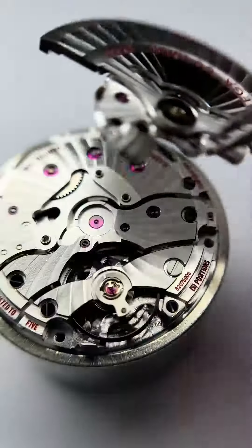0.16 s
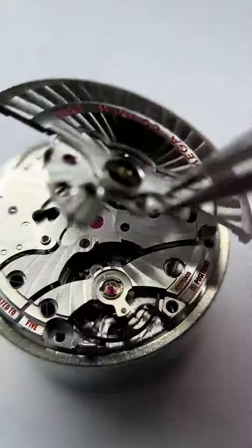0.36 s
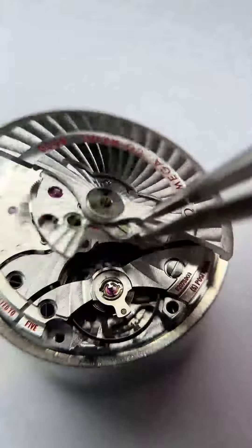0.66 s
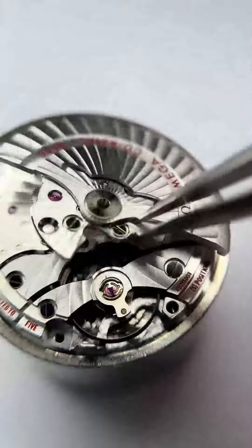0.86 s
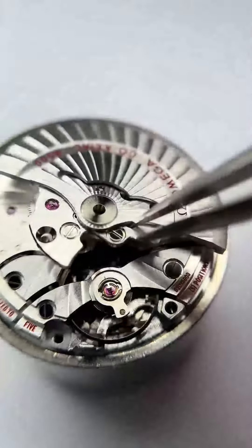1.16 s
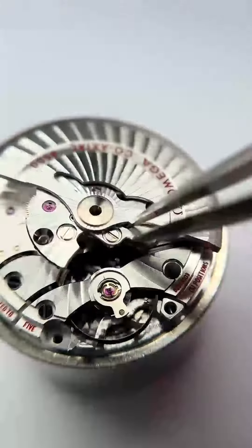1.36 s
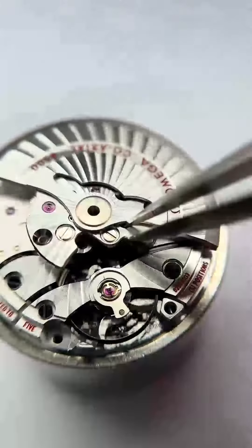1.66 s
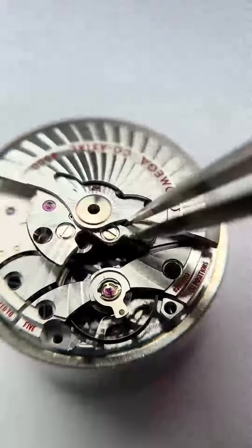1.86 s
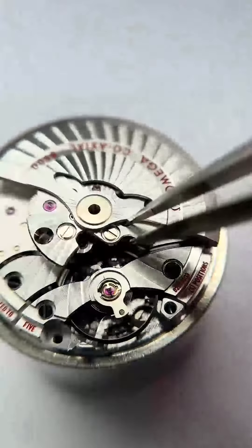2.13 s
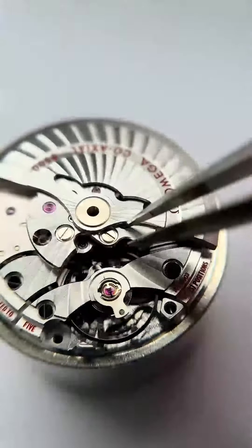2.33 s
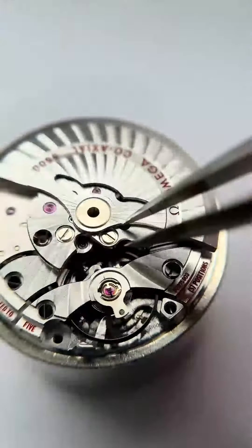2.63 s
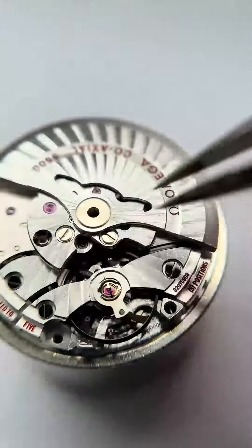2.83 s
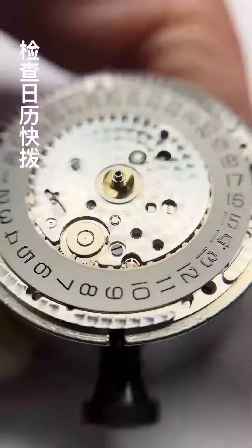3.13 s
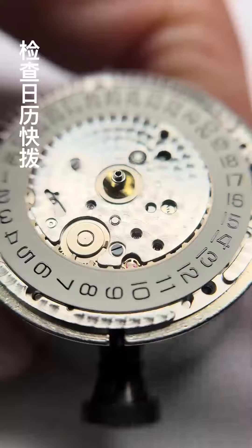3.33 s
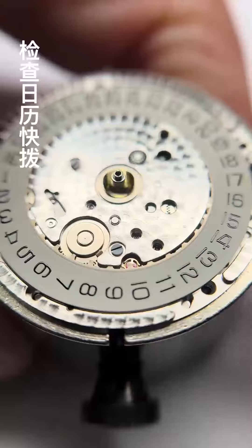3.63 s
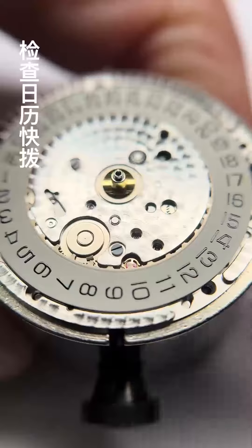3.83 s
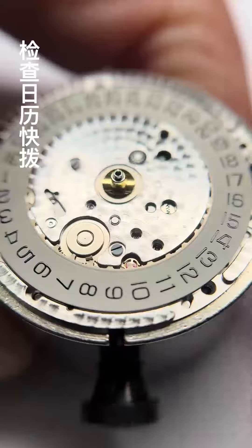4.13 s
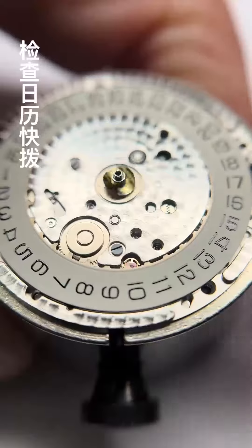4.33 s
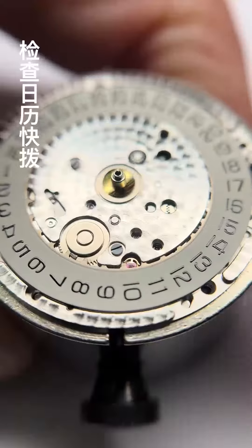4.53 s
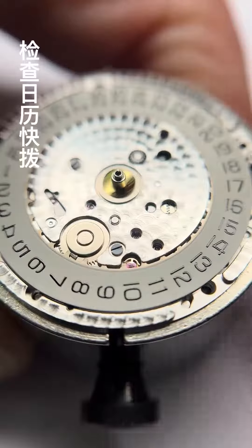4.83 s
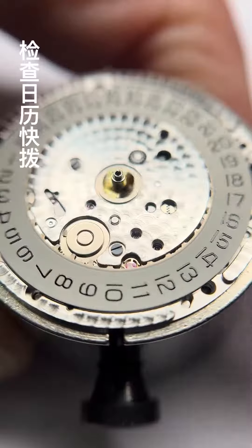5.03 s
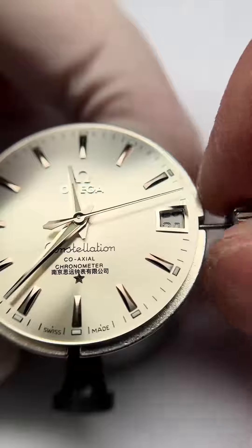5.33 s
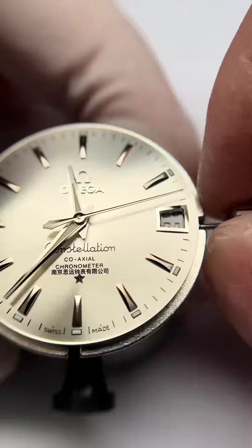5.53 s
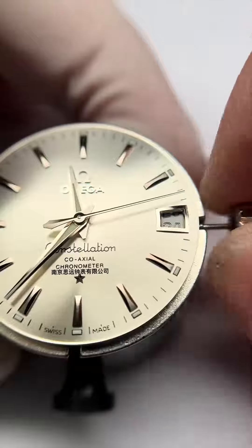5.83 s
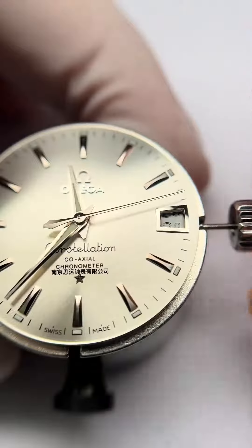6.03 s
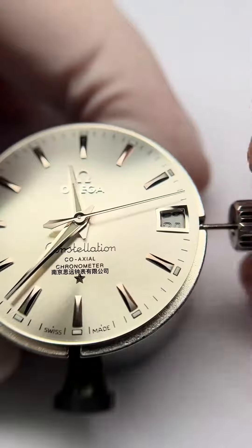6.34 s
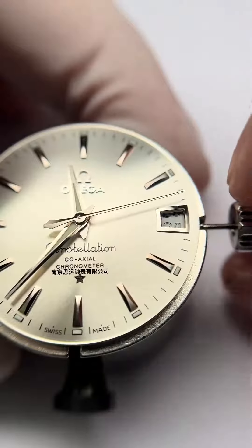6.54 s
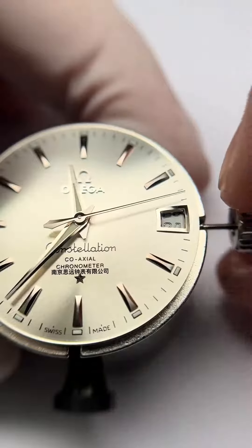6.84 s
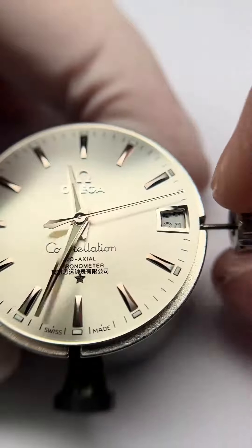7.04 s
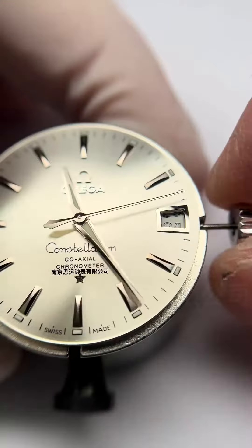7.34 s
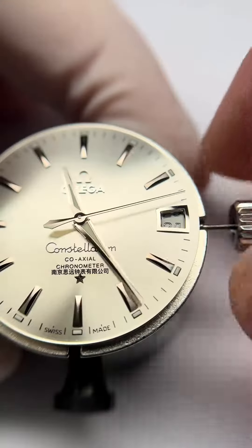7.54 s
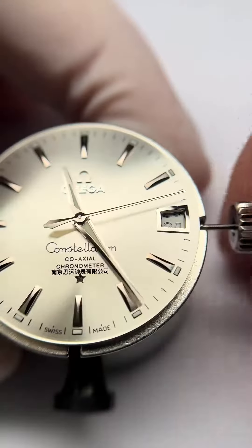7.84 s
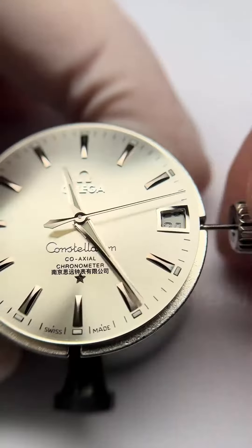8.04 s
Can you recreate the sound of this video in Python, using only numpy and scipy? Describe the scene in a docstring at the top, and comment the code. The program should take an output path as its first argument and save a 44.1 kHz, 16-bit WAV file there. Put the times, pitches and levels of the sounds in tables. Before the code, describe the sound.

Very close at a quiet workbench, a mechanical watch ticks fast and faintly while tweezers tap and clink a metal part into place. After a tiny dropout, thin crisp snaps come in quick bursts over soft finger thuds. Another dropout, then a skin rub, one loud hard crown click, and the ticking stops, leaving quiet room air and a low hum.

```python
"""Watch movement at a quiet workbench

Three close passages: tweezers seat a rotor on a ticking movement, fingers flick the date ring round in
bursts of snaps, then the crown is pulled out with one hard click and the ticking stops. Metal contacts are
rattles of tiny impacts ringing banks of modes; bumps are damped low swings. Skin and cloth rubs, handling
rumble and room air are shaped noise; the fan and a late hum are narrow tones."""
import sys
import numpy as np
from scipy import signal
from scipy.fft import rfft, irfft, next_fast_len
from scipy.io import wavfile

SR = 44100
rng = np.random.default_rng(int(sys.argv[2]) if len(sys.argv) > 2 else 0)


def linear_from_db(decibels):
    """Turn decibels (scalar or array-like) into linear amplitude factors; 0 gives 1."""
    return 10 ** (np.asarray(decibels, float) / 20)


def digitize_waveform(pressure):
    """Quantize a signal to 16-bit integers and store it at the path in sys.argv[1].

    Rows of a 2-D input are taken as channels; values are limited to [-1, 1].
    """
    field = np.atleast_2d(pressure).T
    bounded = np.clip(field, -1, 1)
    quanta = np.round(bounded * 32767).astype(np.int16)
    wavfile.write(sys.argv[1], SR, quanta)


N = 361179
TIME = np.arange(N) / SR

# brief dropouts that divide the three passages: centre t/s, half width/s
DROPOUTS = [(2.933, .012), (5.216, .013)]
# date jumper snapping from tooth to tooth: t/s, low level/dB, middle level/dB, top level/dB, rattle/ms
JUMPER_SNAPS = [(2.9782, -46.5, -38.5, -36, 1.16), (3.0243, -47, -36, -36, 0.64),
                (3.0617, -40.5, -38.5, -31, 0.67), (3.0931, -48, -36.5, -30.5, 0.92),
                (3.1452, -46, -38.5, -36, 0.83), (3.5665, -49.5, -41.5, -34.5, 1.8),
                (3.5989, -42.5, -37.5, -31.5, 1.3), (3.6252, -46.5, -37.5, -37.5, 1.5),
                (3.659, -45, -33.5, -34.5, 0.56), (4.1479, -44.5, -41.5, -35, 1.42),
                (4.2026, -47, -40, -37, 1.1), (4.2541, -40.5, -38.5, -35.5, 1.54),
                (4.3008, -48, -36, -35, 0.5), (4.3663, -44.5, -38.5, -35.5, 2.1),
                (4.8654, -34.5, -31.5, -32, 2.36), (4.8699, -43.5, -40, -37, 0.92),
                (4.9246, -44.5, -37, -33, 1.35), (4.9744, -53, -38, -33, 1.4),
                (5.0307, -43, -39.5, -34.5, 1.15), (5.1131, -47.5, -33, -35, 0.79)]


def coloured(points):
    """Noise of rms 1 with a spectrum drawn through (f/Hz, level/dB) points on a log frequency axis."""
    hz, db = np.transpose(points)
    size = next_fast_len(N)
    f = np.maximum(np.arange(size // 2 + 1) * SR / size, 1)
    gain = linear_from_db(np.interp(np.log(f), np.log(hz), db))
    x = irfft(rfft(rng.standard_normal(size)) * gain, size)[:N]
    return x / x.std()


def narrow(hz, width_hz):
    """Noise of rms 1 ringing in one resonance."""
    x = signal.lfilter(*signal.iirpeak(hz, hz / width_hz, SR), rng.standard_normal(N))
    return x / x.std()


def add(out, s, sound):
    """Mix a sound in at a time."""
    i = int(s * SR)
    out[i:i + len(sound)] += sound[:N - i]


def swells(events, rise_db_s, fall_db_s):
    """Gestures rise, hold and fall, overlaps adding in power; one gain curve for each dB column."""
    s, hold_s, *db = np.transpose(events)[:, :, None]
    t = TIME[::64]
    rise_db = -rise_db_s * np.maximum(s - t, 0)
    fall_db = -fall_db_s * np.maximum(t - s - hold_s, 0)
    shape_db = rise_db + fall_db
    return [np.interp(TIME, t, np.sqrt(np.sum(linear_from_db(c + shape_db) ** 2, axis=0))) for c in db]


def strikes(events, modes, echo_drive_db, echo_t60_s, scatter_db, chatter_db, detune=0.2):
    """Each contact is a blow within a rattle of tiny impacts into the modes, followed by a bench echo."""
    low_hz, high_hz = 2500, 9500  # borders of the low, middle and top mode groups
    out, t = np.zeros(N), TIME[:SR // 8]
    hz, width_hz, db = np.transpose(modes)[:, :, None]
    group = (hz[:, 0] > low_hz).astype(int) + (hz[:, 0] > high_hz)
    for s, *group_db, rattle_ms in events:
        level_chance, pitch_chance = rng.standard_normal((2, len(modes), 1))
        # the blow reaches each mode through the plate: it swells for a cycle or two,
        # leaving dark valleys between modes
        fade = (1 - np.exp(-hz * t / 2.9)) * np.exp(-np.pi * width_hz * t)
        rings = fade * np.sin(2 * np.pi * (hz + detune * width_hz * pitch_chance) * t)
        # sparse impacts: a few large, many small, rising fast and dying away around the main blow
        u = t[:SR // 50] / (max(rattle_ms, .1) / 1000)
        impacts = linear_from_db(chatter_db) * rng.standard_normal(len(u)) ** 3 * u * np.exp(-2 * u)
        impacts[np.argmin(np.abs(u - .5))] -= 1
        rings = signal.fftconvolve(rings, impacts[None])[:, :len(t)]
        # modes share the energy of their group, counted over 4 ms
        share = linear_from_db(db + scatter_db * level_chance)[:, 0]
        group_size = np.sqrt(np.bincount(group, share ** 2))
        share = share * linear_from_db(np.array(group_db)[group]) / group_size[group]
        ring_rms = np.sqrt(np.sum(rings ** 2, axis=1) / (SR / 250))
        sound = share / ring_rms @ rings
        echo = linear_from_db(echo_drive_db) * rng.standard_normal(len(t)) * np.exp(-np.log(1000) * t / echo_t60_s)
        echo = signal.lfilter([1], [1, -.4], echo)  # the bench dulls its echo
        echo[0] = 1  # direct sound
        add(out, s, signal.fftconvolve(sound, echo)[:len(t)])
    return out


def damped_shoves(events, rise_ms):
    """Each shove starts one way and settles in a low, heavily damped mode."""
    out, t = np.zeros(N), TIME[:SR // 4]
    onset = 1 - np.exp(-(1000 * t / rise_ms) ** 2)
    for s, db, direction, hz, t60_s in events:
        decay = np.exp(-np.log(1000) * t / t60_s)
        add(out, s, linear_from_db(db) * np.sign(direction) * onset * decay * np.cos(2 * np.pi * hz * t))
    return out


def passage_levels():
    """Steady gains of the background layers, stepping from passage to passage."""
    # one row a passage: room/dB, handling rumble/dB, dull rub/dB, bright swish/dB, low drone/dB
    steady = [(-61.5, -60, -72.5, -83, -69), (-64, -60, -78, -81.5, -62), (-66.5, -58.5, -77.5, -83, -80)]
    passage = np.searchsorted([s for s, _ in DROPOUTS], TIME)
    return linear_from_db(np.array(steady)[passage].T)


def room_air(gain):
    """Room air as dark shaped noise, over a steady white hiss."""
    # room spectrum: f/Hz, density/dB
    room_spectrum = [(41, -38.5), (75, -24), (115, -19), (160, -10), (291, -8), (356, -10.5), (572, -11),
                     (627, -12.5), (734, -12.5), (1380, -17), (3330, -36.5), (15500, -40)]
    hiss_db = -82
    return gain * coloured(room_spectrum) + linear_from_db(hiss_db) * rng.standard_normal(N)


def fan():
    """The fan's tones, each a noise-driven resonance that wavers by itself."""
    # fan tones: f/Hz, width/Hz, level/dB
    tones = [(441, 20, -79), (752.4, 11, -73), (1900, 30, -86)]
    return sum(linear_from_db(db) * narrow(hz, width_hz) for hz, width_hz, db in tones)


def handling_rumble(steady):
    """Hands shifting their grip: low noise swelling out of a steady rumble."""
    # grip shifts: start t/s, hold/s, level/dB
    shifts = [(.8, 0.46, -68), (2.85, 0.055, -54), (3.0, 0.14, -44), (3.42, 0.076, -43),
              (3.64, 0.052, -43.5), (3.88, 0.11, -43), (4.25, .2, -43.5), (4.6, 0.13, -41.5),
              (4.92, .2, -44), (5.25, 0.64, -50), (6.33, 0.15, -49), (6.95, 0.11, -51.5), (7.55, 0.11, -51)]
    # rumble spectrum: f/Hz, density/dB
    rumble_spectrum = [(12, 2.5), (20, 2.5), (40, -12), (70, -15), (120, -32), (300, -62.5)]
    gain = np.hypot(steady, swells(shifts, rise_db_s=81, fall_db_s=83.5)[0])
    return gain * coloured(rumble_spectrum)


def low_drone(gain):
    """A low drone, noise ringing in one broad resonance."""
    # drone resonance: f/Hz, width/Hz
    resonance = (56, 30)
    return gain * narrow(*resonance)


def skin_and_cloth(dull, bright):
    """Strokes of grainy noise: a dull rub of skin and a bright swish over steady beds of both."""
    # strokes: start t/s, hold/s, dull rub level/dB, bright swish level/dB
    strokes = [(0, 0.16, -74, -68.5), (.2, 0.32, -70.5, -77), (.58, 0.053, -70.5, -82),
               (1.5, 0.18, -68, -76), (1.82, .17, -66.5, -72), (2.6, 0.096, -74.5, -76),
               (2.81, 0.092, -64, -65.5), (3.0, 0.29, -76, -74.5), (3.7, 0.055, -87, -85),
               (4.41, 0.026, -70.5, -75), (4.555, 0.017, -70, -71), (5.24, .22, -72, -69),
               (5.6, 0.026, -67.5, -85), (5.75, 0.17, -63, -63), (6.25, .02, -73.5, -78),
               (6.37, .02, -70, -71), (6.55, .1, -72, -84), (7.2, 0.074, -74.5, -89),
               (7.36, 0.097, -71.5, -76), (8.03, .06, -76, -90)]
    # dull rub spectrum: f/Hz, density/dB
    dull_spectrum = [(1000, -25), (1800, -2.5), (2700, -5), (3600, -4.5), (5000, -5.5), (6300, -10.5),
                     (9000, -40.5)]
    # rub of the finger on the crown, heard in the last passage: f/Hz, density/dB
    crown_spectrum = [(900, -30.5), (1600, -6.5), (2100, -3.5), (2800, -1), (3300, -1.5), (4100, -7.5),
                      (5400, -5), (6500, -12), (9000, -38.5)]
    # bright swish spectrum: f/Hz, density/dB
    swish_spectrum = [(4500, -26.5), (6500, -5), (8500, 1), (9600, -10), (12500, -5.5), (15500, -8.5)]
    dull_strokes, bright_strokes = swells(strokes, rise_db_s=152, fall_db_s=149.5)
    # skin catches and slips: the rub flutters every few milliseconds
    grain = linear_from_db(1.2 * np.repeat(rng.standard_normal(N // 128 + 1), 128)[:N])
    skin = np.where(TIME > DROPOUTS[-1][0], coloured(crown_spectrum), coloured(dull_spectrum))
    rub = np.hypot(dull, dull_strokes) * skin
    swish = np.hypot(bright, bright_strokes) * coloured(swish_spectrum)
    return grain * (rub + swish)


def ticks():
    """Escapement striking seven beats a second, tick and tock a little unevenly spaced."""
    # running spells: first tick t/s, end t/s, top-group level/dB
    spells = [(0.0459, 2.92, -60.5), (3.0328, 5.2, -58), (5.2755, 5.5, -64)]
    # escapement modes: f/Hz, width/Hz, level within group/dB
    modes = [(7450, 520, 0.5), (9980, 1400, -5), (12100, 750, -2.5), (14200, 1200, -2)]
    beat_s, uneven_s = 1 / 7, .001
    rows = []
    for first, end, db in spells:
        for k, s in enumerate(np.arange(first, end, beat_s)):
            rows.append((s + uneven_s * (k % 2), db, db - 11.5, db, 1.6))
    return strikes(rows, modes, echo_drive_db=-27.5, echo_t60_s=0.034, scatter_db=1.7, chatter_db=3.9)


def rotor_touches():
    """Tweezers and rotor touching the bridges, whose plates ring in broad modes."""
    # touches: t/s, low level/dB, middle level/dB, top level/dB, rattle/ms
    touches = [(0.0785, -59, -64, -76, 1.9), (0.4902, -53, -37, -39, 1.7), (0.4927, -53, -44, -57, 1.7),
               (0.6105, -56, -63, -77, 6), (0.7298, -59, -61, -78, 6), (0.8011, -57, -56, -75, 1.7),
               (0.8125, -49, -39, -45, 0.61), (1.6785, -43, -35.5, -48, 2), (1.6829, -43.5, -37, -44, 1.5),
               (2.0463, -52.5, -48.5, -62, 1.4), (2.2016, -46, -42.5, -54, 0.71),
               (2.2059, -56, -57, -47, 1.4), (2.2359, -56, -39.5, -52, 0.98),
               (2.2434, -67, -39.5, -48, 1.2), (2.2522, -43.5, -38, -40.5, 0.67),
               (2.2591, -49, -45, -53, 2), (2.35, -50, -46.5, -50, 2.4), (2.212, -55, -52, -65, 5.5),
               (2.356, -54, -57, -65, 4.6), (2.3731, -64, -58, -78, 1.1), (2.5903, -53.5, -52.5, -76, 2.5),
               (2.6238, -63, -55.5, -64, 2.5)]
    # bridge modes: f/Hz, width/Hz, level within group/dB
    modes = [(1400, 1600, 5.5), (1905, 210, 4), (2145, 300, -4), (2750, 880, -11.5), (3840, 300, -7),
             (4135, 880, 10.5), (4870, 380, 1), (6800, 3400, 0.5), (6980, 83, -8), (7400, 570, -1.5),
             (10900, 1000, -14), (12150, 580, 12.5), (12050, 40, -38), (13250, 360, 6.5), (14900, 700, -5)]
    return strikes(touches, modes, echo_drive_db=-35.5, echo_t60_s=0.03, scatter_db=2.7, chatter_db=11.0)


def holder_knocks():
    """Tweezers knocking the holder, which rings in one low mode."""
    # knocks: t/s, level/dB, t60/s
    knocks = [(.49, -44, 0.046), (0.722, -47, 0.16), (.81, -42.5, .032), (1.682, -39.5, 0.041),
              (2.046, -42, 0.038), (2.245, -41, 0.061), (2.35, -43, 0.03)]
    holder_hz = 263.7
    return damped_shoves([(s, db, 1, holder_hz, t60_s) for s, db, t60_s in knocks], rise_ms=1.14)


def far_clink():
    """Something set down further off, mostly room sound: noise in its resonances, dying with the room."""
    # resonances: level/dB, f/Hz, width/Hz, t60/s
    resonances = [(-51, 1275, 29, 0.63), (-53, 1230, 120, .1), (-60.5, 4040, 1300, 0.69),
                  (-62.5, 7900, 610, 0.42)]
    start_s, rise_s = 1.163, 0.011
    t = np.maximum(TIME - start_s, 0)
    rise = np.minimum(t / rise_s, 1)
    return sum(linear_from_db(db) * narrow(hz, width_hz) * rise * np.exp(-np.log(1000) * t / t60_s)
               for db, hz, width_hz, t60_s in resonances)


def rebounds():
    """Within a burst the ring bounces once between one tooth and the next."""
    # rebound strength: low level/dB, middle level/dB, top level/dB, scatter/dB
    strength = (-62.5, -59, -67, 4.5)
    *group_db, scatter_db = strength
    delay_s, gap_share = .004, .23  # delay = this time plus this share of the gap to the next snap
    burst_gap_s = .1  # a longer wait ends a burst
    s = np.array(JUMPER_SNAPS)[:, 0]
    rows = []
    for snap_s, gap, chance in zip(s, np.diff(s), rng.standard_normal(len(s))):
        if .01 < gap < burst_gap_s:
            levels = np.array(group_db) + scatter_db * chance
            rows.append((snap_s + delay_s + gap_share * gap, *levels))
    return rows


def date_ring():
    """Jumper snaps, rebounds and light contacts of finger and teeth, all ringing the thin date ring."""
    # light contacts and harder rebounds: t/s, low level/dB, middle level/dB, top level/dB
    contacts = [(3.0382, -53, -57, -70), (3.1068, -50, -55, -71), (4.2678, -64, -51, -58),
                (4.318, -60, -53, -57), (3.276, -64, -67, -81), (3.4684, -47, -52.5, -75),
                (3.4774, -48, -49.5, -64.5), (3.5266, -62, -58, -62), (3.7661, -62, -55.5, -60),
                (3.7766, -74, -56, -53), (4.086, -66, -57.5, -71), (4.4526, -59, -55, -70),
                (4.5588, -60, -57.5, -58), (4.5682, -64.5, -63, -61), (4.8135, -63, -57, -58),
                (4.8735, -61, -51, -58)]
    # date ring modes: f/Hz, width/Hz, level within group/dB
    modes = [(486, 340, -3), (1646, 386, 5), (1700, 1150, 4.5), (2760, 660, -9.5), (4680, 410, -5),
             (5550, 220, -15), (7100, 32, -17.5), (7510, 270, -4.5), (8400, 1670, 4), (10100, 35, -13),
             (10350, 460, 3), (11100, 9.5, -14), (11110, 370, 15.5), (13500, 2100, 18.5), (13450, 580, 3),
             (15500, 700, 10)]
    light = [(*row, 1.3) for row in list(contacts) + rebounds()]  # 1.3 ms rattle
    return strikes(list(JUMPER_SNAPS) + light, modes,
                   echo_drive_db=-38.5, echo_t60_s=0.045, scatter_db=4.5, chatter_db=2.6)


def finger_shoves():
    """Fingers shoving the hand-held movement, each shove a thud at its own low pitch."""
    # shoves: t/s, level/dB, direction (+1 or -1), f/Hz, t60/s
    shoves = [(3.09, -29.5, 1, 70, 0.017), (3.146, -30, -1, 113, 0.015), (3.464, -37, -1, 25, .11),
              (3.479, -29, 1, 25, 0.11), (3.636, -35, 1, 139, .036), (3.766, -35, -1, 200, 0.013),
              (4.0206, -27.5, 1, 44.6, 0.058), (4.3, -35.5, -1, 99, 0.023), (4.451, -37.5, -1, 123, 0.05),
              (4.598, -35, -1, 70, 0.02), (4.756, -35.5, 1, 25.1, 0.097), (4.775, -37, -1, 50, .056),
              (4.865, -39, 1, 90.5, 0.048), (5.568, -15.5, -1, 197, 0.015), (5.57, -34.5, 1, 90.2, 0.056),
              (7.471, -50.5, 1, 70, 0.066)]
    return damped_shoves(shoves, rise_ms=0.95)


def late_hum():
    """A low hum in the last passage: a pure tone plus narrow noise that makes it waver."""
    # hum: start t/s, f/Hz, waver width/Hz, level/dB, waver level relative to the tone/dB
    hum = (5.5, 146, 4, -72, -6)
    start_s, hz, width_hz, db, waver_db = hum
    tone = np.sin(2 * np.pi * hz * TIME) + linear_from_db(waver_db) * narrow(hz, width_hz)
    return (TIME > start_s) * linear_from_db(db) * tone


def crown_clicks():
    """The crown pulled hard out of its detent, then clicking as it turns, ringing the case."""
    # clicks: t/s, low level/dB, middle level/dB, top level/dB, rattle/ms
    clicks = [(5.5684, -22, -16.5, -32.5, 0.33), (6.485, -75, -69.5, -85, 2),
              (7.4015, -60.5, -74, -86.5, 0.42)]
    # case modes: f/Hz, width/Hz, level within group/dB
    modes = [(955, 60, -9), (1090, 90, -11), (1430, 190, 0), (1890, 250, -1), (2300, 280, -5),
             (3100, 500, -4), (4250, 350, -9), (5300, 950, 0), (7950, 600, -3), (8300, 40, -36),
             (11300, 900, -2), (13800, 700, 0), (15200, 500, -9)]
    return strikes(clicks, modes, echo_drive_db=-58, echo_t60_s=0.17, scatter_db=0.23, chatter_db=-10.0,
                   detune=0.042)


def scene():
    """All sources at the bench, mixed to one channel."""
    room, rumble, dull, bright, drone = passage_levels()
    background = room_air(room) + fan() + late_hum() + low_drone(drone)
    hands = handling_rumble(rumble) + skin_and_cloth(dull, bright)
    bumps = holder_knocks() + finger_shoves()
    metal = ticks() + rotor_touches() + date_ring() + crown_clicks()
    return (background + hands + bumps + metal + far_clink())[None]


def top_cut(x):
    """Nothing passes above the cut-off."""
    return signal.sosfilt(signal.butter(12, 16720, fs=SR, output="sos"), x)


def record(dry):
    """The sound drops out briefly between passages; a steep low-pass cuts the top."""
    top_hz = 15600
    dips = np.prod([np.clip(np.abs(TIME - s) / half_s, 0, 1) ** 3 for s, half_s in DROPOUTS], axis=0)
    low_pass = signal.ellip(8, .2, 40, top_hz, fs=SR, output="sos")
    mix = signal.sosfilt(low_pass, dry * dips)
    return top_cut(mix)


dry = scene()
out = record(dry)
digitize_waveform(out)
```